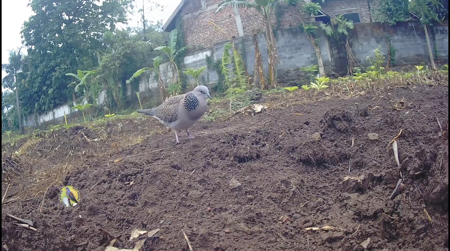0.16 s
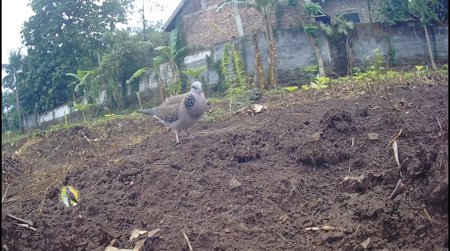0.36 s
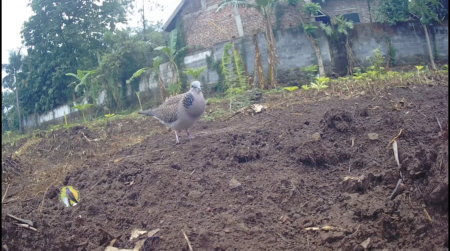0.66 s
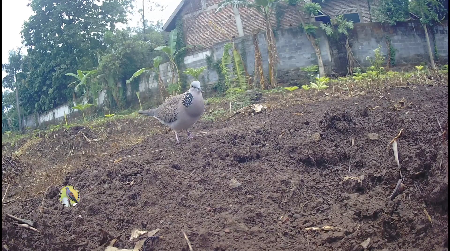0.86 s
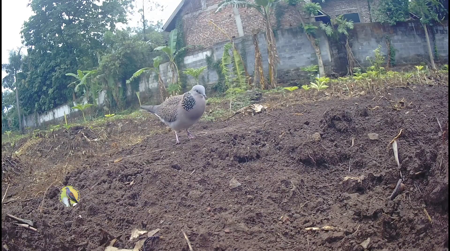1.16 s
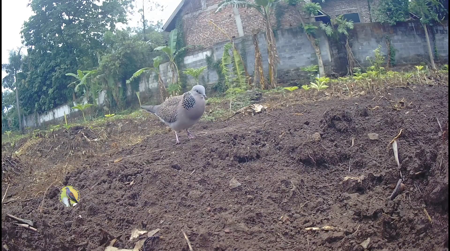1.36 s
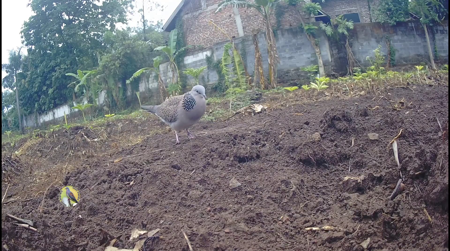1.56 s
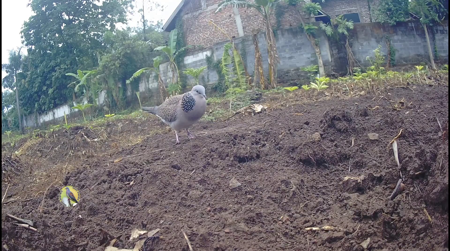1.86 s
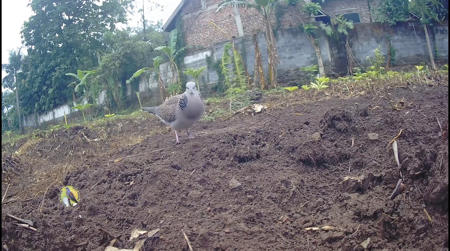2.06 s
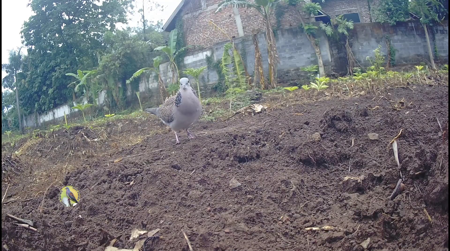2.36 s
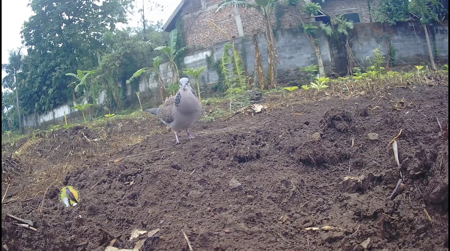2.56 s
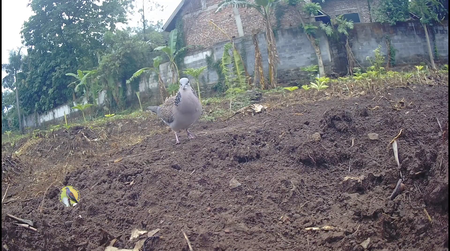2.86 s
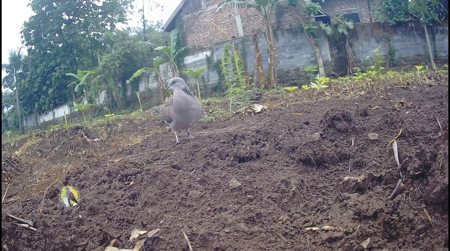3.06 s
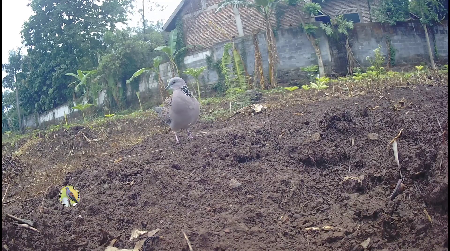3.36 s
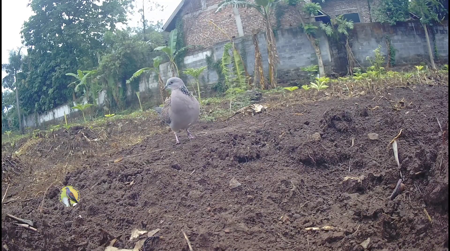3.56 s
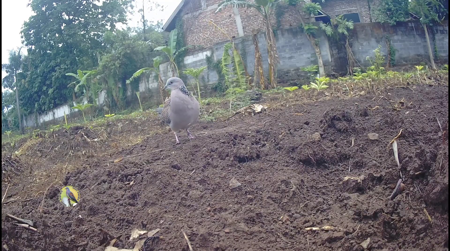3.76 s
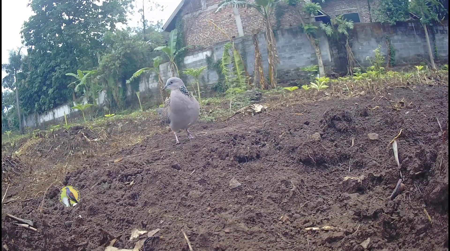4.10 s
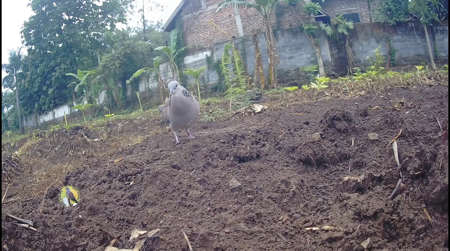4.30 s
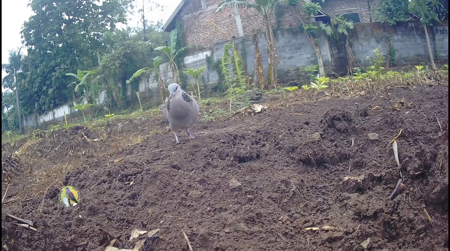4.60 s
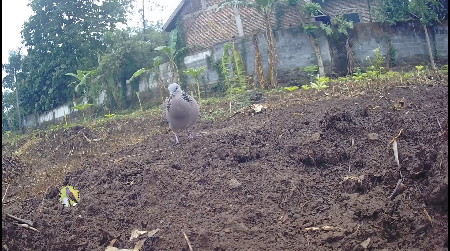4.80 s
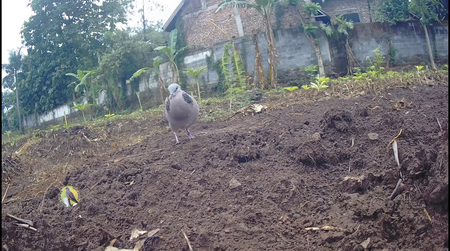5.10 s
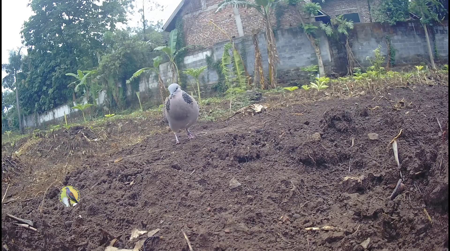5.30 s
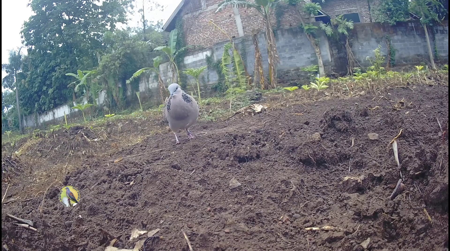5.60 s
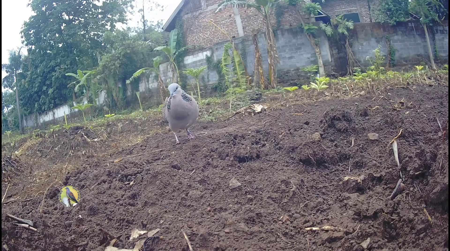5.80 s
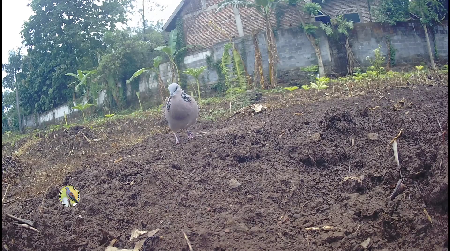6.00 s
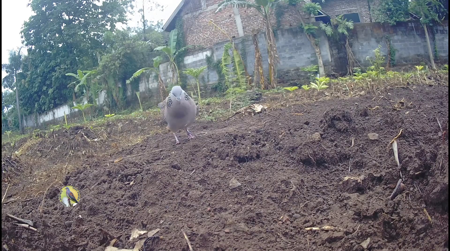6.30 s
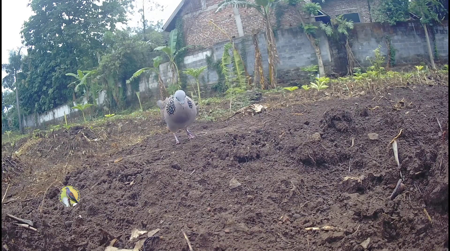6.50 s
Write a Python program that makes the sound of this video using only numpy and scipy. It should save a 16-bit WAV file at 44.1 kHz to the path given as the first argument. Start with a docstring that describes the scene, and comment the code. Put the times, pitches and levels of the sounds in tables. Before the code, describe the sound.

A dove close by gives three throaty, purring coos, the last cut short, over low distant traffic rumble in a garden.

```python
"""Dove cooing in a garden

A spotted dove on bare soil calls three times, close to a small camera; the third call has no long coo.
Each note is a near-pure tone that a fluttering valve chops; the camera's limiter ducks everything under it.
Far traffic is rumbling noise with wavering drones; an insect is narrow noise in bursts.
A distant bird cries in gliding partials and pips; the camera adds hiss, a whine and faint ringing ticks."""
import sys
import numpy as np
from scipy import signal
from scipy.io import wavfile
from scipy.ndimage import minimum_filter1d

SR = 44100
rng = np.random.default_rng(int(sys.argv[2]) if len(sys.argv) > 2 else 0)


def materialize(psi):
    """Save the field psi as 16-bit PCM at rate SR to the path in sys.argv[1].

    A 1-D psi becomes a single channel; in a 2-D psi each row is a channel.
    """
    bounded = np.clip(np.atleast_2d(psi).T, -1, 1)
    quanta = np.round(bounded * 32767).astype(np.int16)
    wavfile.write(sys.argv[1], SR, quanta)


N = 293265
TIME = np.arange(N) / SR
CUTOFF_HZ = 14800   # the top is cut above this
SETTLE_S = 0.011    # time the dove's valve takes to start or stop fluttering


def hoots(first_hz=430, last_hz=450, flutters_per_s=76):
    """A short clean arch of pitch; past its top the valve begins to flutter."""
    # the hoot that opens each call: start/s, top/s, end/s, top pitch/Hz, level/dB before the crop,
    # curvature of the fall, valve closure at the end
    hoot_notes = [(0.98, 1.018, 1.084, 709, 4.5, 1.2, 0.6), (4.246, 4.292, 4.34, 698, 2, 0.51, 0.28),
                  (6.308, 6.361, 6.405, 719, 3, 1.3, 0.58)]
    out = 0
    for start, top, end, top_hz, db, fall_curve, last_closure in hoot_notes:
        t = clock(start, end)
        pitch = arch(t, top, first_hz, top_hz, last_hz, rise_curve=1.8, fall_curve=fall_curve)
        closure = np.interp(t, [top, end], [0, last_closure])
        beats = (t - top) * flutters_per_s + .5
        level_db = db + fade_db(t, attack_s=0.015, release_s=0.0015)
        out = out + coo(t, pitch, level_db, closure, beats, puff_db=-27, glide=0.44, slip=0.19)
    return out


def tick_runs(pitch_hz=570, closure=8, growth_db_per_s=70):
    """Between hoot and roll the nearly shut valve passes only soft ticks, which grow with the pressure."""
    # runs of ticks: start/s, end/s, rate/ticks per s, level at the end/dB before the crop
    tick_notes = [(1.088, 1.159, 70, -6), (4.336, 4.447, 61, -8.5), (6.413, 6.484, 67, -6)]
    out = 0
    for start, end, rate, db in tick_notes:
        t = clock(start, end)
        level_db = db + growth_db_per_s * (t - end)
        beats = (t - start) * rate
        out = out + coo(t, pitch_hz, level_db, closure, beats, puff_db=-50, glide=.6, slip=.16,
                        waver=.5, loose=.16, uneven_db=1.0)
    return out


def rolls(first_hz=555, top_hz=718, last_hz=450, top_after_s=.014, trill_closure=0.46):
    """A rising trill: the valve then stays open for a steady tone, which drops at the very end."""
    # rolls: start/s, valve begins to stay open/s, end/s, rate/flutters per s, level/dB before the crop
    roll_notes = [(1.156, 1.2368, 1.293, 77, 5), (4.442, 4.531, 4.589, 80.5, 5),
                  (6.485, 6.584, 6.641, 81, 5)]
    out = 0
    for start, opens, end, rate, db in roll_notes:
        t = clock(start, end)
        pitch = arch(t, opens + top_after_s, first_hz, top_hz, last_hz, rise_curve=0.97, fall_curve=3.8)
        closure = np.interp(t, [opens, opens + SETTLE_S], [trill_closure, 0])
        level_db = db + fade_db(t, attack_s=0.012, release_s=0.0089)
        beats = (t - opens) * rate
        out = out + coo(t, pitch, level_db, closure, beats, puff_db=-30.5, glide=.55, slip=.14)
    return out


def long_coos(first_hz=600, top_hz=766, rise_s=0.055, first_rate=48, late_rate=55.3,
              first_closure=0.74, eased_closure=.32, late_closure=.25, last_closure=.2,
              tiring_db_per_s=36, hard_slip=0.016, late_slip=.27, hard_waver=.32, late_waver=0.8):
    """A hard trill speeds up and softens, the valve stays open, then a looser trill sinks away."""
    # long coos: start/s, valve held open from/s, to/s, end/s, top rate/flutters per s,
    # time to reach that rate/s, last pitch/Hz, level/dB before the crop
    long_notes = [(1.425, 1.66, 1.694, 1.886, 72.5, .12, 571.4, 7.5),
                  (4.731, 5.032, 5.06, 5.218, 78.5, .21, 533.4, 8)]
    out = 0
    for start, opens, resumes, end, top_rate, speed_up_s, last_hz, db in long_notes:
        t = clock(start, end)
        early = t < opens
        pitch = arch(t, start + rise_s, first_hz, top_hz, last_hz, rise_curve=2.2, fall_curve=2.5)
        hard = np.interp(t, [start, opens - SETTLE_S, opens], [first_closure, eased_closure, 0])
        soft = np.interp(t, [resumes - SETTLE_S, resumes, end], [0, late_closure, last_closure])
        early_rate = np.interp(t, [start, start + speed_up_s], [first_rate, top_rate])
        beats = np.where(early, np.cumsum(early_rate) / SR, (t - resumes) * late_rate)
        tiring_db = tiring_db_per_s * np.maximum(t - resumes, 0)
        level_db = db + fade_db(t, attack_s=0.014, release_s=0.016) - tiring_db
        out = out + coo(t, pitch, level_db, hard + soft, beats, puff_db=-26.5, glide=.68,
                        slip=np.where(early, hard_slip, late_slip),
                        waver=np.where(early, hard_waver, late_waver))
    return out


def coo(t, pitch, level_db, closure, beats, puff_db, glide, slip, waver=.2, jitter=0.011, loose=0.065,
        uneven_db=0.8, crop_hz=622, crop_width=255, crop_top_hz=880, overtone_lift=0.054,
        overtone_pulsing=1.5, shrill_db_per_octave=22, shrill_hz=775, octave_db=-40, whistle_db=-59.5,
        beak_hz=5600, puff_s=0.025, rasp_db=-42, hiss_db=-70, spit_db=-57, spit_spread_db=5,
        full_voice_hz=696, weaker_db_per_octave=20, leak=.05):
    """One note: a fluttering valve chops and bends a tone, which the inflated crop radiates.
    The valve shuts near whole beats; closure 0 is a steady tone, 1 separate pulses, 8 short ticks."""
    # overtones that leak past the crop: multiple of the pitch, level/dB
    overtone_levels = [(2, -50.5), (3, -56.5)]
    # glide within one pulse of a hard trill: place/share of the beat, pitch offset/share before scaling
    pulse_glide = [(.2, -0.2), (.68, .07)]
    size = len(t)
    beats = beats + waver * drift(23, size=size) / (2 * np.pi)
    opening = (leak ** 2 + np.sin(np.pi * beats) ** 2) ** closure
    fluttering = np.minimum(4 * closure, 1)

    # in a hard trill each pulse starts low and climbs; a soft trill hardly bends
    hardness = glide * np.clip((closure - .18) / .24, 0, 1)
    bend = hardness * np.interp(beats, *np.transpose(pulse_glide), period=1)
    # at each closing the tone stumbles for an instant, which cuts a sharp notch
    bend = bend - slip * fluttering * np.cos(np.pi * beats) ** 20
    # the pitch is least steady while the valve is nearly shut
    unsteady = drift(70, size=size)
    wobble = (jitter + loose * (1 - np.minimum(opening, 1))) * unsteady
    phase = phase_of(pitch * (1 + bend + wobble))

    # pressure raises pitch and level together: full voice from one pitch up, weaker below it
    octaves_below = np.minimum(np.log2(pitch / full_voice_hz), 0)
    pressure = from_db(level_db + weaker_db_per_octave * octaves_below)
    # while the valve flutters, the pulses differ a little in strength
    strength = pressure * opening * from_db(uneven_db * fluttering * drift(25, size=size))
    # each pulse fades as it climbs out of the crop's resonance
    in_crop = resonate(strength * np.sin(phase), crop_hz, crop_width)
    tone = butter(in_crop, crop_top_hz, "low", order=6)

    # the overtones hold steadier, near the top of each glide; higher notes carry more of them
    top_wobble = (jitter + loose * fluttering / 4) * unsteady
    top_phase = phase_of(pitch * (1 + overtone_lift * hardness + bend / 4 + top_wobble))
    shrill_gain = from_db(shrill_db_per_octave * np.log2(pitch / shrill_hz))
    shrill = pressure * opening ** overtone_pulsing * shrill_gain
    overtones = shrill * sum(from_db(db) * np.sin(k * top_phase) for k, db in overtone_levels)
    # below about 1 kHz the octave is kept stronger, so low notes have more of it
    low_octave = butter(strength * np.sin(2 * phase), 1000, "low", order=8)
    overtones = overtones + from_db(octave_db) * low_octave
    # 7 and 8 times the pitch whistle thinly in a narrow resonance of the beak
    thin = shrill * (np.sin(7 * top_phase) + np.sin(8 * top_phase) / 2)
    whistle = from_db(whistle_db) * resonate(thin, beak_hz, 220)

    # dull air noise: a soft puff as the valve first lets go, then a rasp on each pulse
    air = butter(rng.standard_normal(size), 280, "high")
    air = rms_one(butter(air, 930, "low", order=12))
    puff = from_db(puff_db) * air * gate(t[0], t[0] + puff_s, 0.0048, 0.0045, t)
    rasp = from_db(rasp_db) * strength * air
    # a faint hiss of air rides on the whole note
    hiss_noise = rms_one(butter(rng.standard_normal(size), [1500, 3300], "band"))
    hiss = from_db(hiss_db) * pressure * hiss_noise
    # a tiny spit breaks out a third of a beat after each closing, on some pulses more than others
    outbreak = fluttering * strength * np.cos(np.pi * (beats - 1 / 3)) ** 20
    spit_gain = from_db(spit_db + spit_spread_db * drift(25, size=size))
    spit_noise = rms_one(butter(rng.standard_normal(size), [1200, 2100], "band"))
    spit = outbreak * spit_gain * spit_noise

    note = tone + overtones + hiss + spit + whistle + puff + rasp
    return place(note * gate(t[0], t[-1], .002, .003, t), t)


def garden(x, t60=0.7, dull_hz=1500):
    """Soil, plants and a wall scatter a short dull tail: fading noise, different at each port."""
    t = TIME[:SR // 2]
    scatter = butter(rng.standard_normal((2, len(t))), dull_hz, "low") * from_db(-60 * t / t60)
    scatter = scatter / np.sqrt(np.sum(scatter ** 2) / 2)
    return signal.fftconvolve(x[None], scatter, axes=1)[:, :N]


def far_bird(first_hz=1330, rise_s=.048, rough=0.008, echo_db=-5):
    """Thin cries leap up and slide down, with a few short falling pips; all echo in the garden."""
    # cries: start/s, end/s, level/dB before the partials' own, top pitch/Hz, last pitch/Hz
    bird_calls = [(0.395, 0.54, -68.5, 1640, 1540), (1.899, 2.09, -72, 1610, 1400),
                  (3.145, 3.32, -66, 1610, 1420)]
    # partials of the cry (the pitch itself is not sounded): multiple of the pitch, level/dB
    bird_partials = [(2, 2), (3, 2.5), (4, -11)]
    # faint pips: middle/s, pitch there/Hz, level/dB, length/s, fall/Hz per s
    pips = [(0.297, 1770, -48, .022, 10000), (0.556, 2710, -57.5, .03, 4000),
            (2.297, 1746, -49, .026, 21000)]
    out = 0
    for start, end, db, top_hz, last_hz in bird_calls:
        t = clock(start, end)
        pitch = arch(t, start + rise_s, first_hz, top_hz, last_hz, rise_curve=2.4, fall_curve=1.25)
        phase = phase_of(pitch * (1 + rough * drift(48, size=len(t))))
        cry = sum(from_db(partial_db) * np.sin(k * phase) for k, partial_db in bird_partials)
        level_db = db + fade_db(t, attack_s=0.036, release_s=0.039) + 2 * drift(40, size=len(t))
        out = out + place(cry * from_db(level_db), t)
    for middle, hz, db, length, fall in pips:
        t = clock(middle - length / 2, middle + length / 2)
        level_db = db + fade_db(t, attack_s=0.00707, release_s=0.0081)
        pip = np.sin(phase_of(hz - fall * (t - middle)))
        out = out + place(from_db(level_db) * pip, t)
    return out + from_db(echo_db) * garden(out, t60=.5, dull_hz=6030)


def insect(hz=7580, width=190):
    """A thin buzz, noise through two narrow resonances, swells and stops short."""
    # bursts: start/s, end/s, level/dB
    buzzes = [(0.727, 1.279, -71.5), (2.044, 2.565, -71), (3.28, 3.83, -71), (4.592, 5.112, -71.5),
              (5.71, 6.314, -71.5)]
    level = sum(from_db(db) * gate(start, end, 0.12, 0.016) for start, end, db in buzzes)
    buzz = resonate(resonate(rng.standard_normal((2, N)), hz, width), hz, 2 * width)
    return level * rms_one(buzz)


def traffic(rumble_db=-28, waver_db=2.5, waver=0.00796):
    """Far road rumble is shaped noise; wavering sine drones of far engines swell and fade over it."""
    # engines: loudest moment/s, drone/Hz, level before wavering/dB, time from there to 3 dB weaker/s
    engines = [(0.3, 69, -33.5, 0.48), (3.5, 75, -33, .3), (3.25, 161, -30.5, 0.32),
               (3.1, 140, -35.5, 0.18), (5.2, 180, -31.5, .1), (5.3, 156, -34, 0.47),
               (0.45, 204, -39, 0.45), (5.6, 195, -36.5, 0.28), (0.58, 243, -40.5, 0.47),
               (2.5, 275, -36, 0.54), (5.7, 273, -36.5, 0.18)]
    # spectrum of the rumble: f/Hz, relative level per Hz/dB
    rumble_spectrum = [(15, -45), (25, -21), (40, -8.5), (59, 1), (81, 1.5), (128, -2), (162, -5),
                       (214, -5), (275, -12), (298, -12), (422, -13), (482, -14.5), (588, -18.5),
                       (934, -24.5), (1300, -60.5), (1690, -72), (2860, -120)]
    drones = 0
    for loudest, hz, db, half_width in engines:
        nearness = 1 / np.hypot(1, (TIME - loudest) / half_width)
        gain = nearness * from_db(db + waver_db * drift(0.98))
        drones = drones + gain * np.sin(phase_of(hz * (1 + waver * drift(3))))
    rumble = banded_noise(rumble_spectrum, patchy_db=2.06, count=26)
    return from_db(rumble_db) * rumble + drones


def camera_noise(hiss_db=-57.5, whine_hz=3170, whine_db=-68, first_tick=0.0059, pictures_per_s=25.01):
    """Microphone hiss, a thin whine of narrow noise, and a faint ringing tick with every picture."""
    # ringing of the electrical tick: f/Hz, level/dB before a random shift, time to fade by 60 dB/s
    tick_modes = [(1975, -51, 0.019), (4820, -60.5, 0.018)]
    # spectrum of the hiss: f/Hz, relative level per Hz/dB
    hiss_spectrum = [(650, -40), (1100, -20.5), (1240, -5), (1740, -2.5), (2360, -10.5), (3100, -6),
                     (3980, -24.5), (4840, -7), (5340, -18), (7640, -20.5), (8160, -21.5), (12200, -22),
                     (14800, -30.5)]
    at = (np.arange(first_tick, TIME[-1], 1 / pictures_per_s) * SR).astype(int)
    ticks = 0
    for hz, db, t60 in tick_modes:
        clicks = np.zeros(N)
        clicks[at] = from_db(db + rng.normal(-1, 3, len(at)))
        ticks = ticks + ring(clicks, hz, t60)
    whine = from_db(whine_db) * rms_one(resonate(rng.standard_normal((2, N)), whine_hz, 45))
    return from_db(hiss_db) * banded_noise(hiss_spectrum, patchy_db=0.7, count=14) + whine + ticks


def banded_noise(spectrum, patchy_db, count):
    """Bands of stereo noise, each with its own level, flicker and likeness of the channels; rms 1."""
    # likeness of the two channels: f/Hz, likeness/0-1
    likeness = [(100, 0.96), (600, 1), (1000, .85), (1400, .5), (2500, .55), (4000, .15), (8000, 0)]
    out = 0
    edges = np.geomspace(spectrum[0][0], min(spectrum[-1][0], CUTOFF_HZ), count + 1)
    white = rng.standard_normal((2, 2, N))      # neighbouring bands get unrelated noise
    for k, (low, high) in enumerate(zip(edges, edges[1:])):
        mid, side = butter(white[k % 2], [low, high], "band")
        hz = np.sqrt(low * high)
        alike = np.clip(at_hz(likeness, hz), 0, 1)
        gain = from_db(at_hz(spectrum, hz) + patchy_db * drift(6))
        # the side noise has opposite signs in the two channels
        out = out + gain * (mid + np.sqrt((1 - alike) / (1 + alike)) * side * [[1], [-1]])
    return out / np.sqrt(np.mean(out.mean(axis=0) ** 2))


def clock(start, end):
    """The times of the samples from start to end."""
    return TIME[int(start * SR):int(end * SR)]


def place(x, t):
    """Set a sound at its times t in an otherwise silent track."""
    first = round(t[0] * SR)
    return np.pad(x, (first, N - first - len(x)))


def arch(t, top_s, first_hz, top_hz, last_hz, rise_curve, fall_curve):
    """Pitch that climbs to a top and falls away; a curve of 1 is straight, higher is flatter on top."""
    before = np.clip((top_s - t) / (top_s - t[0]), 0, 1)
    after = np.clip((t - top_s) / (t[-1] - top_s), 0, 1)
    return top_hz - (top_hz - first_hz) * before ** rise_curve - (top_hz - last_hz) * after ** fall_curve


def fade_db(t, attack_s, release_s, depth_db=22):
    """Attack, hold and release of a note, in dB relative to its full level."""
    return depth_db * (gate(t[0], t[-1], attack_s, release_s, t) - 1)


def gate(start, end, rise, fall, t=TIME):
    """1 between start and end, with straight ramps inside."""
    return np.clip(np.minimum((t - start) / rise, (end - t) / fall), 0, 1)


def phase_of(hz):
    """Running phase of a pitch curve."""
    return 2 * np.pi * np.cumsum(hz) / SR


def drift(rate, size=N):
    """Slow random wander of spread about 1; a higher rate (Hz) wanders faster."""
    # made at a fortieth of the sample rate; the first 2000 values let the filter settle
    r = np.exp(-80 * np.pi * rate / SR)
    slow = signal.lfilter([1], [1, -2 * r, r * r], rng.standard_normal(size // 40 + 2002))[2000:]
    return np.interp(np.arange(size) / 40, np.arange(len(slow)), rms_one(slow))


def resonate(x, hz, width):
    """Two-pole resonance with gain 1 on top."""
    r = np.exp(-np.pi * width / SR)
    poles = [1, -2 * r * np.cos(2 * np.pi * hz / SR), r * r]
    return signal.lfilter(np.array([1, 0, -1]) * (1 - r * r) / 2, poles, x)


def ring(clicks, hz, t60):
    """A unit click sets a decaying sine of height 1 ringing."""
    r = from_db(-60 / (t60 * SR))
    w = 2 * np.pi * hz / SR
    # the tiny offset keeps the filter's numbers from becoming too small to compute quickly
    return signal.lfilter([0, np.sin(w)], [1, -2 * r * np.cos(w), r * r], clicks + 1e-18)


def butter(x, hz, kind, order=2):
    """Causal Butterworth filter."""
    return signal.sosfilt(signal.butter(order, hz, kind, fs=SR, output="sos"), x)


def at_hz(points, hz):
    """Read a curve of (Hz, value) points on a log-frequency axis."""
    points = np.array(points)
    return np.interp(np.log(hz), np.log(points[:, 0]), points[:, 1])


def from_db(db):
    """Decibels to gain."""
    return 10 ** (np.asarray(db) / 20)


def rms_one(x):
    """Scale to rms 1."""
    return x / np.sqrt(np.mean(x ** 2) + 1e-20)


def pan(x, db, lag_ms):
    """A sound at the two microphone ports: left differs from right by db and hears it a little later."""
    left, right = np.broadcast_to(x, (2, N))
    later = np.interp(TIME - lag_ms / 1000, TIME, left)
    return np.array([later, right]) * from_db(np.array([[db], [-db]]) / 2)


def let_go(db, db_per_s):
    """Follow a level up at once and down at a steady rate."""
    return np.maximum.accumulate(db + db_per_s * TIME) - db_per_s * TIME


def scene():
    """The dove in front, everything else far behind it, with the camera's own noise."""
    dove = hoots() + tick_runs() + rolls() + long_coos()
    near = pan(dove, db=-2.05, lag_ms=0.031) + from_db(-47.5) * garden(dove, t60=0.5)
    road = pan(butter(traffic(), 29, "high"), db=-2.5, lag_ms=.02)
    return near + road + insect() + far_bird() + camera_noise() * from_db([[-.5], [.5]])


def record(dry, sense_hz=520, threshold_db=-7.5, release_db_per_s=125, attack_hz=40, slow_db_per_s=50):
    """A limiter turns everything down under loud coos, slower to let go after long ones; the top is cut."""
    sensed = butter(dry.mean(axis=0), sense_hz, "high")
    sensed_db = 20 * np.log10(np.abs(sensed) + 1e-9)
    held_db = let_go(np.maximum(sensed_db - threshold_db, 0), release_db_per_s)
    # whatever reduction has lasted a quarter of a second is released slowly
    lasting_db = minimum_filter1d(held_db, size=SR // 4, origin=SR // 8 - 1)
    held_db = np.maximum(held_db, let_go(lasting_db, slow_db_per_s))
    # the gain moves smoothly and is applied 3 ms early
    smooth_db = butter(butter(held_db, attack_hz, "low", order=1), 150, "low")
    down_db = np.interp(TIME + .003, TIME, smooth_db)
    limited = dry * from_db(-down_db)
    return signal.sosfilt(signal.ellip(10, .1, 90, CUTOFF_HZ, fs=SR, output="sos"), limited)


dry = scene()
out = record(dry)
materialize(out)
```